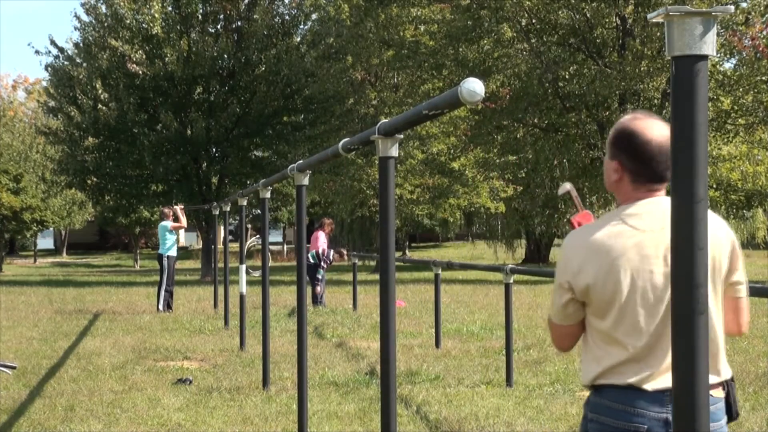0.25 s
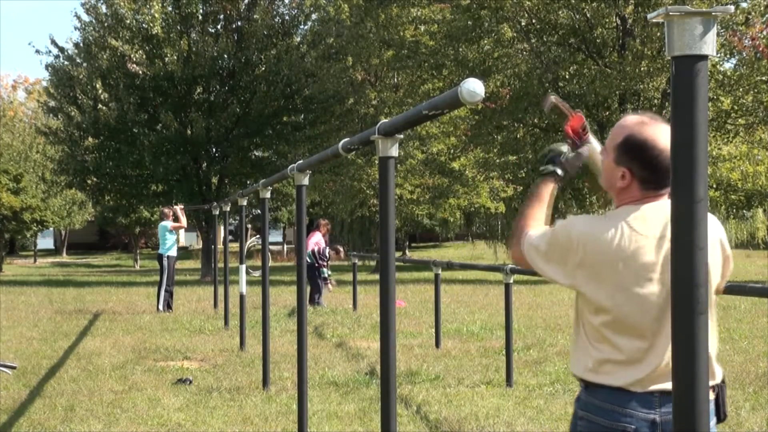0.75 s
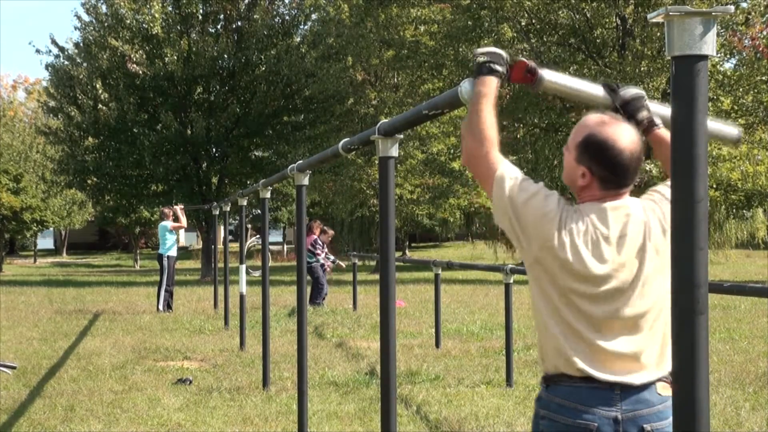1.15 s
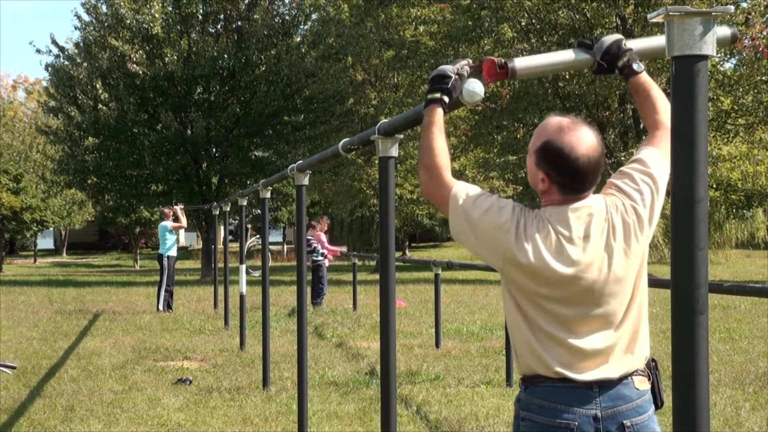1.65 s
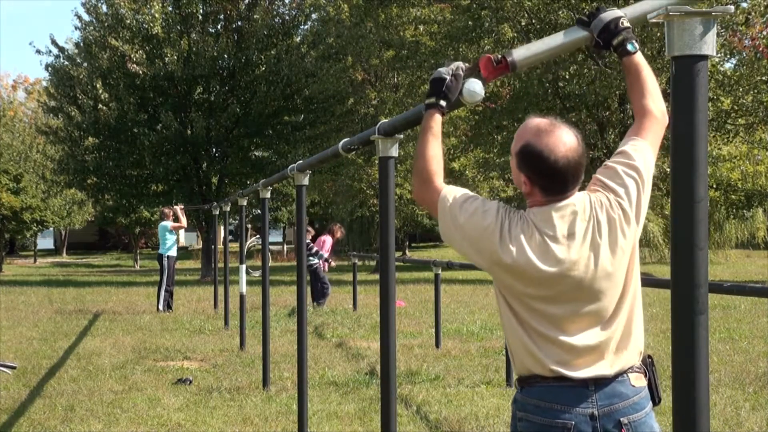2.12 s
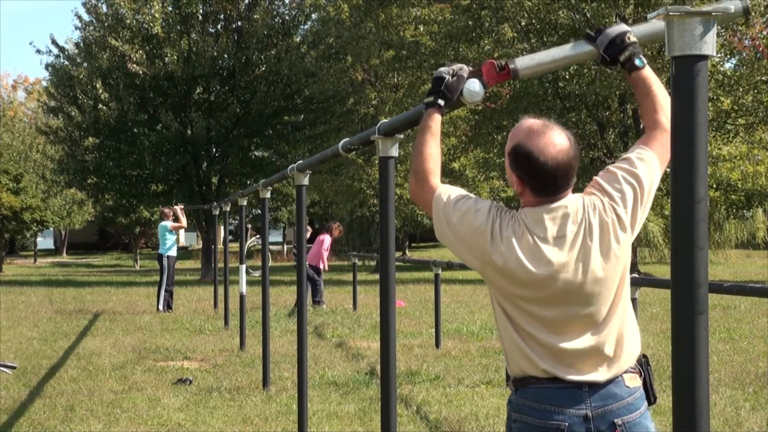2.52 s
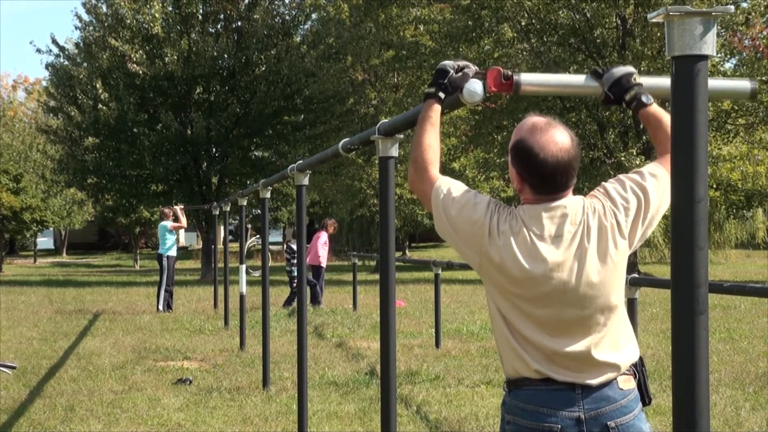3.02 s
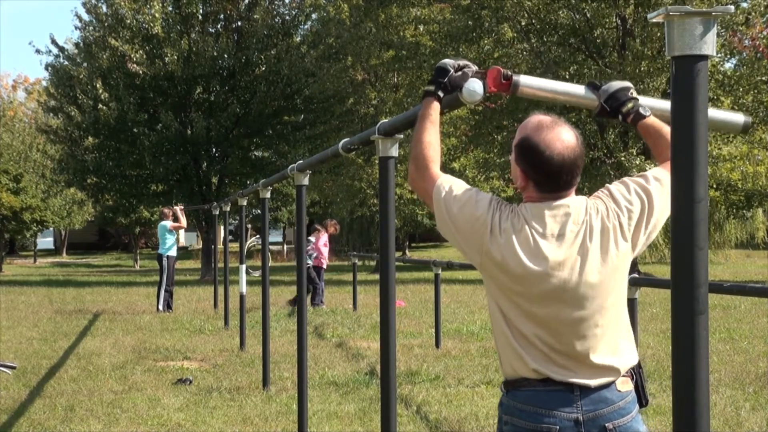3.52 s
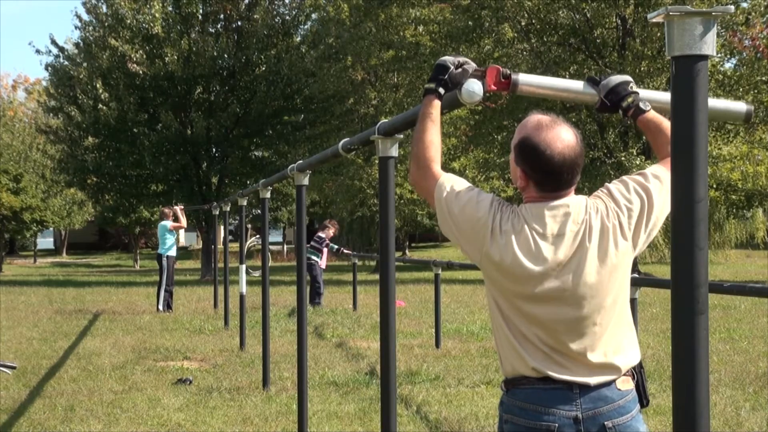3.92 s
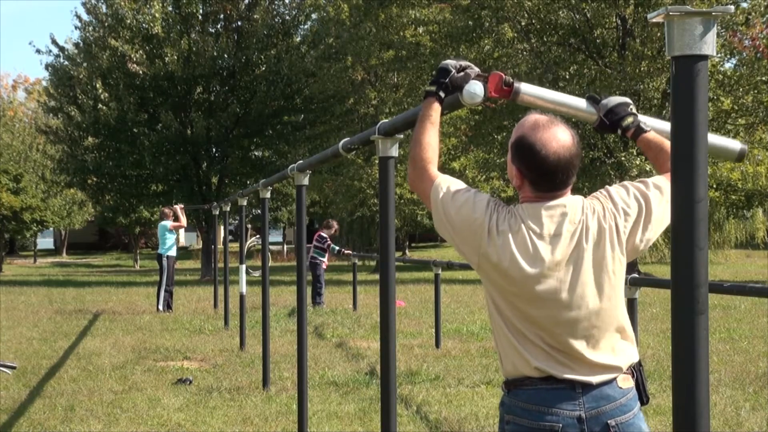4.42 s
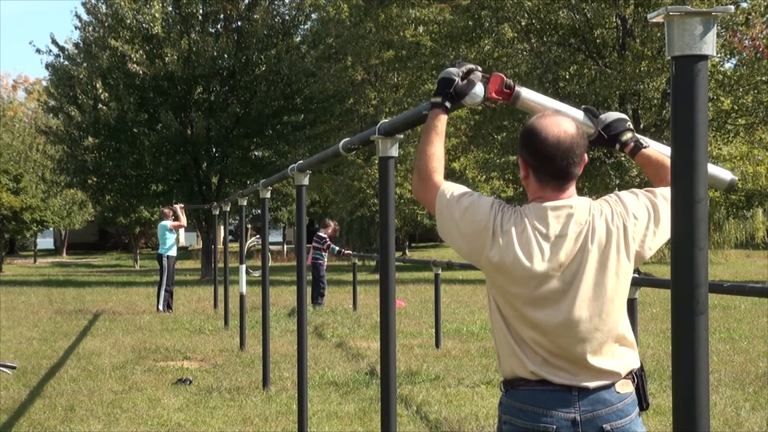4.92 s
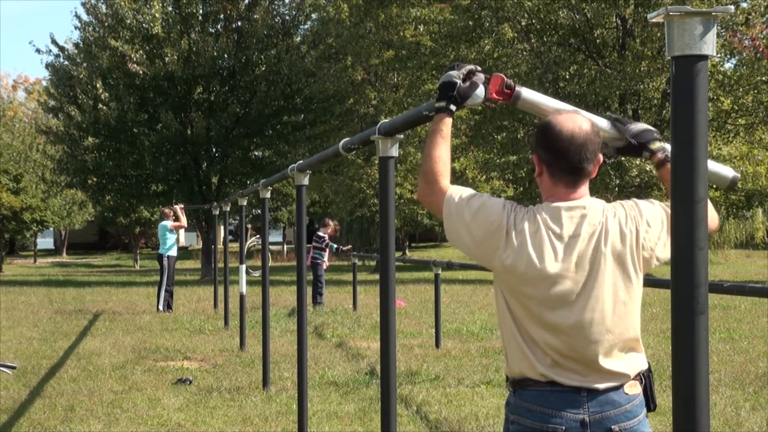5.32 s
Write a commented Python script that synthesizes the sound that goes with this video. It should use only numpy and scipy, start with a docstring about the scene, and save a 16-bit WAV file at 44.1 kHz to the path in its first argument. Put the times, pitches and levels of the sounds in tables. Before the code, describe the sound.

A pipe wrench is hooked onto a steel rail, giving a few light clinks and a short scrape. After a pause its loose jaw snaps and rattles, then clanks hard with a brief ring. Near the end the rail settles with a soft hollow boom. The metal sounds come from slightly right, in an open space with faint high insect chirps, a wash of leaves and a low hum.

```python
"""Insects chirp high in the grass, by stridulation, over a wash of leaves, a breeze and a low hum.
A long pipe wrench is hooked onto a galvanized steel rail, turned and reset: its loose jaw clinks,
scrapes and once clanks hard. Each impact excites damped modes of the wrench, the pipe rings on
faintly, and trees scatter the sound back. A small motor whines faintly on the right at a steady
beat. Near the end the rail settles in its bracket with a hollow boom."""
import sys
import numpy as np
from scipy import signal
from scipy.fft import rfft, irfft, next_fast_len
from scipy.io import wavfile
from scipy.ndimage import uniform_filter1d, minimum_filter1d, map_coordinates

SR = 44100
rng = np.random.default_rng(int(sys.argv[2]) if len(sys.argv) > 2 else 0)


def master(y):
    """Save y as 16-bit WAV."""
    cut = np.clip(np.atleast_2d(y).T, -1, 1)
    pcm = np.round(cut * 32767)  # scale
    wavfile.write(sys.argv[1], SR, pcm.astype(np.int16))


N = 245195

# spectrum of leaves and distance: frequency_hz, density_db
AIR_SPECTRUM = [(88, -39.5), (150, -50.5), (222, -20.5), (318, -15), (472, -13.5), (520, -12.5),
                (584, -13.5), (771, -13), (1260, -14), (1440, -15.5), (2130, -18), (2420, -18.5),
                (7500, -31), (9750, -72), (16500, -120)]
# its balance: frequency_hz, left_minus_right_db
AIR_BALANCE = [(60, -24.5), (110, -15), (200, 21), (380, 4), (700, 6.5), (1290, 6.5), (2380, 8), (4400, 10),
               (8120, 25), (15000, -15)]
# its likeness between left and right: frequency_hz, coherence
AIR_COHERENCE = [(60, 0.82), (130, 0.37), (290, 0.32), (640, 0.78), (1410, 0.78), (3100, 1), (6820, 0.93),
                 (15000, 0.0)]
# low drone under the hum: frequency_hz, density_db
DRONE_SPECTRUM = [(15, -33), (35, -11), (46, -5), (54, -4), (59, -3.5), (68, 2), (79, 2), (91, -5.5),
                  (104, 2), (125, -8.5), (160, -11.5), (220, -16.5), (500, -17.5), (8500, -30),
                  (12000, -33), (16000, -39.5)]
# thin hiss above the hum: frequency_hz, density_db
HISS_SPECTRUM = [(4000, -32.5), (7500, -4.5), (11000, -7.5), (12000, -14.5), (14500, -6.5), (15300, -13.5),
                 (15800, -27)]
# wind rumble: frequency_hz, density_db
WIND_SPECTRUM = [(15, -8.5), (35, -1), (70, -13.5), (200, -25), (600, -62)]
# blur of many insects: frequency_hz, density_db
CHORUS_SPECTRUM = [(6000, -46.5), (7700, -7.5), (8600, 7.5), (9300, 8.5), (9900, -5), (10500, -28.5),
                   (11500, -27), (13000, -49)]
# the nearest insect's bouts of ten chirps: start_s, first_interval_s, lengthening_per_chirp_s, level_db
NEAR_BOUTS = [(.072, .174, .0042, -47.3), (3.503, .208, .0014, -47.5)]
# farther insects: pitch_hz, period_s, level_db, left_minus_right_db
FAR_SINGERS = [(9900, .195, -57, 5), (8900, .205, -59, -1.5), (9500, .173, -60, 1)]
# modes of the wrench clamped against the pipe: frequency_hz, level_db, t60_s
WRENCH_MODES = [(1958, -16, .11), (2340, -19, .09), (2998, -11, .1), (3091, -3, .1), (3343, -10, .11),
                (3466, -17, .13), (3815, -20, .07), (4362, -15, .08), (4416, -11, .08), (4455, 1, .11),
                (5250, -9, .1), (5292, -14, .12), (5830, -18, .07), (6181, -17, .12), (7205, -19, .15),
                (7620, -28, .13), (8430, -20, .12), (8550, -15, .08), (8766, -12, .12), (9072, -8, .1),
                (9400, -13, .11), (9850, -19, .11), (10346, -16, .12), (10960, -20, .15), (11690, -24, .12),
                (12330, -23, .13), (12790, -30, .12), (13110, -30, .13), (13900, -33, .1)]
# modes of the free length of pipe: frequency_hz, level_db, t60_s
PIPE_MODES = [(2884, 0, 1.2), (3085, -8, .8), (4500, -8, .5), (5270, -8, .55), (6944, -1, .3)]
# rattle of the loose jaw: frequency_hz, density_db
JAW_SPECTRUM = [(150, -61), (700, -19), (1600, -31), (2000, -2.5), (2350, -12.5), (2540, -12.5),
                (2800, -0.5), (3150, 2.5), (4000, -7), (4550, -4), (5350, -10), (5800, -12.5), (9600, -19),
                (13000, -28), (15500, -45.5)]
# hollow resonances of the rail and its posts: centre_hz, width_hz, gain_db
RAIL_RESONANCES = [(192, 95, -12.5), (268.6, 50, -3.5), (479, 190, -6), (844, 160, -1.5), (1060, 82, -3),
                   (1190, 121, -5), (1452, 104, -1), (1685, 230, -5), (2520, 410, -6.5)]
# faint steel ticks, the one at 1.305 s an echo of the first clink: start_s, jaw_db, rail_db
FAINT_TICKS = [(.179, -55, -55), (1.305, -49, -46.5), (1.599, -55, -50.5), (1.618, -41, -42),
               (2.106, -48, -52), (2.336, -57.5, -55.5), (3.777, -44.5, -43.5), (4.154, -44.5, -52.5),
               (4.406, -42.5, -60)]
# the wrench strikes the pipe, each spot favouring one note:
# start_s, rise_s, ring_db, pipe_db, jaw_db, rail_db, treble_db, note_hz, note_db
PIPE_BLOWS = [ (1.258, 0.0024, -41, -76, -33.5, -40.5, 4, 4460, -26.5),
              (1.2622, 0.00075, -43, -79, -29, -45, 0, 3480, -35),
              (1.625, .0014, -48.5, -86, -45.5, -41, 8.5, 12800, -26.5),
              (1.671, .0011, -55, -78, -38, -36.5, -3, 2390, -36),
              (1.6835, 0.00087, -50, -74, -27.5, -47.5, 13, 7760, -26),
              (1.703, 0.0042, -29.5, -55, -26, -49, -8, 1953, -23),
              (3.3095, .0003, -31, -69.5, -26, -51, 3, 8550, -27),
              (4.1652, .0006, -10, -70, -13, -37, -1, 3060, -18),
              (4.1842, .001, -8.5, -39, -18, -46, -1, 4400, -19),
              (4.798, 0.0059, -39, -53.5, -29.5, -44, -15, 1940, -35.5),
              (4.8309, .0007, -43, -68, -31, -40, 0, 3780, -27), ]
# the loose jaw snaps against its frame: start_s, rise_s, jaw_db, treble_db, note_hz
JAW_SNAPS = [(2.937, 0.0055, -46.5, -12, 3080), (2.973, .005, -50.5, -6, 3075),
             (3.3113, 0.00022, -27.5, 7, 3180), (3.7534, .003, -32.5, -2.5, 3140),
             (3.8134, 0.00057, -35, -5, 3185), (3.938, .0012, -51, -2.5, 3050),
             (4.047, .0015, -46.5, -8.5, 3090), (4.3696, .0014, -26.5, -3.5, 3073)]
# balance of the direct sound of wrench and rail: frequency_hz, left_minus_right_db
DIRECT_BALANCE = [(200, -14), (1200, -5.5), (1950, -6), (2800, -3.5), (3400, -5), (4400, -6), (5400, -8),
                  (6200, -9), (7600, -4), (8600, 0), (10500, -1), (12200, -5), (15000, -1)]
# its phase between the channels: frequency_hz, left_lead_rad
DIRECT_PHASE = [(100, -0.26), (700, 0.21), (2400, -0.37), (3100, -0.52), (4200, -0.34), (5300, -0.61),
                (6600, 1), (9000, 0.99), (10500, 0.3), (12000, 0.16)]
# reverberation among the trees: frequency_hz, t60_s
TREE_DECAY = [(200, 0.537), (1000, 0.53), (3000, 0.34), (10000, 0.26)]
# a small motor's run-ups: first_start_s, period_s, length_s, peak_hz, droop_hz, level_db
MOTOR_RUNS = (.30, .539, .17, 1465, 220, -63)
# hollow modes of the settling rail: frequency_hz, level_db, t60_s
BOOM_MODES = [(192.7, -11, .28), (458, -3.5, 0.13), (840, 2, 0.083), (1040, -12.5, .3)]


def amp(db):
    """Amplitude ratio of a level in decibels."""
    return 10 ** (np.asarray(db) / 20)


def unit(x):
    """Normalisation to an rms of 1."""
    return x / np.sqrt(np.mean(x ** 2) + 1e-20)


def along(points, hz):
    """Interpolation of (frequency_hz, value) points on a logarithmic frequency axis."""
    knots_hz, values = np.transpose(points)
    return np.interp(np.log(hz + 1), np.log(knots_hz + 1), values)


def fade(t, t60):
    """Exponential decay by 60 dB in t60 seconds."""
    return np.exp(-np.log(1000) * t / np.maximum(t60, 1e-3))


def wobble(rate_hz):
    """Random modulation: a spline through rate_hz Gaussian knots a second."""
    knots = rng.standard_normal(int(N * rate_hz / SR) + 4)
    return map_coordinates(knots, [np.arange(N) * rate_hz / SR])


def filtered(x, response):
    """Linear filtering: the spectrum is multiplied by a complex frequency response."""
    size = x.shape[-1]
    padded = next_fast_len(size + SR // 10)
    return irfft(rfft(x, padded) * response(np.fft.rfftfreq(padded, 1 / SR)), padded)[..., :size]


def noise(spectrum, size):
    """Spectral shaping of white noise, at an rms of 1."""
    return unit(filtered(rng.standard_normal(size), lambda hz: amp(along(spectrum, hz))))


def pan(left_db):
    """Amplitude panning: left and right gains whose mean is 1."""
    pair = np.vstack([amp(left_db / 2), amp(-left_db / 2)])
    return pair / pair.mean(axis=0)


def add(track, start_s, sound):
    """Superposition of a sound onto a track."""
    start = int(np.clip(round(start_s * SR), 0, N - 1))
    track[start:start + len(sound)] += sound[:N - start]


def air(level_db=-58):
    """Partial coherence: leaves and distance give a wash whose mid-to-side ratio sets its width."""
    def mid_side_gains(hz):
        angle = np.arccos(np.clip(along(AIR_COHERENCE, hz), -1, 1)) / 2
        return np.array([np.cos(angle), np.sin(angle)])
    mid, side = filtered(noise(AIR_SPECTRUM, (2, N)), mid_side_gains)
    pair = filtered(np.array([mid + side, mid - side]), lambda hz: pan(along(AIR_BALANCE, hz)))
    return amp(level_db + 0.13 * wobble(0.25) + 0.13 * wobble(22)) * unit(pair)


def hum(pitch_hz=108, tone_db=-64, drone_db=-58, hiss_db=-72):
    """Phase and amplitude modulation make a tone waver over a drone and hiss, mostly on the right."""
    phase = 2 * np.pi * pitch_hz * np.arange(N) / SR + .35 * wobble(2.3)
    tone = amp(tone_db + 1.2 * wobble(14)) * unit(np.sin(phase))
    drone = amp(drone_db) * noise(DRONE_SPECTRUM, N)
    hiss = amp(hiss_db) * noise(HISS_SPECTRUM, N)
    return pan(-19) * (tone + drone) + pan(-45) * hiss


def breeze(level_db=-81, puff_db=4, puffs_per_s=4):
    """Turbulence: light puffs raise an uncorrelated rumble at each microphone port."""
    return pan(-17) * amp(level_db + puff_db * wobble(puffs_per_s)) * noise(WIND_SPECTRUM, (2, N))


def chirp(pitch_hz, length_s, glide_hz, stroke_hz=148, sweep_hz=750, rasp=0.31):
    """Stridulation: pitch falls within each wing stroke, and climbs and levels off over the chirp."""
    t = np.arange(int(length_s * SR)) / SR
    stroke = t * stroke_hz % 1
    climb = np.sin(2 * t / length_s) - np.sqrt(.5)
    hz = pitch_hz + glide_hz * climb - sweep_hz * (stroke - .5)
    uneven_teeth = uniform_filter1d(rng.standard_normal(len(t)), size=16)  # on the wing file
    drift = rasp * np.cumsum(uneven_teeth) / np.sqrt(20)
    envelope = np.sin(np.pi * stroke) ** 2 * signal.windows.tukey(len(t), .2)
    return envelope * np.sin(2 * np.pi * np.cumsum(hz) / SR + drift)


def insects(chorus_db=-66, near_hz=9270):
    """Independent sources superpose: one near insect, three farther ones and a blur of many more."""
    near, far = np.zeros(N), np.zeros((2, N))
    for start_s, interval_s, slowing_s, db in NEAR_BOUTS:
        for k, (late, loud, longer) in enumerate(rng.standard_normal((10, 3))):
            onset_s = start_s + k * interval_s + slowing_s * k * (k - 1) / 2 + 0.0031 * late
            add(near, onset_s, amp(db + loud) * chirp(near_hz, 0.042 + 0.003 * longer, glide_hz=445))
    for pitch_hz, period_s, db, left_db in FAR_SINGERS:
        voice = np.zeros(N)
        for k, (late, loud, sharp) in enumerate(rng.standard_normal((33, 3))):
            call = chirp(pitch_hz + 80 * sharp, length_s=.08, glide_hz=550, rasp=.9)
            add(voice, k * period_s + .02 * late, amp(db + 1.5 * loud) * call)
        far += pan(left_db) * voice
    chorus_gain = amp(chorus_db + 0.82 * wobble(22))
    chorus = noise(CHORUS_SPECTRUM, N) + 0.69 * noise(CHORUS_SPECTRUM, (2, N))  # centred plus diffuse
    return pan(-1) * near + far + chorus_gain * chorus


def ticks(rise_s=0.0014, treble_db=6.5, note_hz=1960, note_t60=0.1):
    """Linear scaling: in each faint tick, wrench, pipe and one note ring in proportion to the rattle."""
    return [(start_s, rise_s, jaw_db - 15.5, jaw_db - 20, jaw_db, rail_db,
             treble_db, note_hz, jaw_db + 2.5, note_t60) for start_s, jaw_db, rail_db in FAINT_TICKS]


def clatter(peak_width_hz=110, valley_db=-7):
    """Resonant filtering: the rattle of the loose jaw is heard through the modes of the wrench."""
    def response(hz):
        peaks = [1 / np.hypot(1, 2 * (hz - mode_hz) / peak_width_hz) for mode_hz, _, _ in WRENCH_MODES]
        return np.hypot(amp(valley_db), np.max(peaks, axis=0))
    return unit(filtered(noise(JAW_SPECTRUM, 2 * SR), response))


def ringing(modes, t, treble, scatter_db):
    """Free vibration: a sum of damped modes with random phases and slightly scattered strengths."""
    hz, db, t60 = np.transpose(modes)[:, :, None]
    strength = amp(db + scatter_db * rng.standard_normal(hz.shape)) * treble(hz)
    return np.sum(strength * fade(t, t60) * np.sin(2 * np.pi * (hz * t + rng.random(hz.shape))), axis=0)


def rail_response(hz):
    """Forced vibration: the rail responds as a sum of second-order resonators of alternating sign."""
    return sum((-1) ** k * amp(db) * 1j * hz * width / (centre ** 2 - hz ** 2 + 1j * hz * width)
               for k, (centre, width, db) in enumerate(RAIL_RESONANCES))


def wrench(events, jaw_t60, rail_t60, grit, treble_hz=6000):
    """Impact excitation: each clink sums jaw rattle, the ring of wrench and pipe, and a rail thud."""
    steel, shake, rattle = np.zeros(N), np.zeros(N), clatter()
    t, pipe_t = np.arange(SR // 3) / SR, np.arange(SR) / SR
    for (start_s, rise_s, ring_db, pipe_db, jaw_db, rail_db,
         treble_db, note_hz, note_db, note_t60) in events:
        # a hard edge excites more of the high modes than a glancing touch
        treble = lambda hz: amp(treble_db * (1 + np.tanh(4 * np.log((hz + 1) / treble_hz))) / 2)
        attack = 1 - np.exp(-t / rise_s)
        ring = amp(ring_db) * ringing(WRENCH_MODES, t, treble, scatter_db=1)
        note = amp(note_db) * fade(t, note_t60) * np.sin(2 * np.pi * note_hz * t)
        jaw = amp(jaw_db) * fade(t, jaw_t60) * filtered(rattle[rng.integers(SR):][:len(t)], treble)
        add(steel, start_s, (ring + note + jaw) * attack)
        add(steel, start_s, amp(pipe_db) * ringing(PIPE_MODES, pipe_t, treble, scatter_db=.5))
        add(shake, start_s, amp(rail_db) * fade(t, rail_t60) * attack * rng.standard_normal(len(t)))
    shake *= unit(np.exp(grit * wobble(300)))  # the rail rattles unevenly in its brackets
    rms_gain = np.sqrt(np.mean(np.abs(rail_response(np.arange(SR // 2))) ** 2))
    return steel, filtered(shake, rail_response) / rms_gain


def outdoors(x, tail_db, echo_db, echo_s=0.06, smear_s=0.0078, build_s=0.016):
    """Scattering: trees add a diffuse tail and one smeared echo to the direct sound from the right."""
    lead = lambda hz: np.exp(.5j * along(DIRECT_PHASE, hz) * np.array([[1], [-1]]))
    direct = filtered(x, lambda hz: pan(along(DIRECT_BALANCE, hz)) * lead(hz))
    hz, t, bands = signal.stft(rng.standard_normal((2, SR // 2)), SR, nperseg=256)
    envelope = fade(t, along(TREE_DECAY, hz)[:, None]) * (1 - np.exp(-t / build_s))
    _, tail = signal.istft(bands * envelope, SR, nperseg=256)
    delay_s = np.arange(tail.shape[1]) / SR
    echo = rng.standard_normal(tail.shape) * np.exp(-((delay_s - echo_s) / smear_s) ** 2)
    answer = amp(tail_db) * tail / np.linalg.norm(tail[0]) + amp(echo_db) * echo / np.linalg.norm(echo[0])
    return direct + signal.fftconvolve(x[None], answer, axes=1)[:, :N]


def motor_whine():
    """Pitch follows rotation rate: a small motor on the right speeds up and coasts down repeatedly."""
    first_s, period_s, length_s, peak_hz, droop_hz, level_db = MOTOR_RUNS
    track = np.zeros(N)
    progress = np.linspace(0, 1, int(length_s * SR))
    hz = peak_hz - droop_hz * (1 - np.sin(np.pi * progress ** .8))
    for k, loud in enumerate(rng.standard_normal(8)):
        drift = .05 * np.cumsum(rng.standard_normal(len(progress)))
        tone = np.sin(2 * np.pi * np.cumsum(hz) / SR + drift)
        add(track, first_s + k * period_s, amp(level_db + loud) * np.sin(np.pi * progress) * tone)
    return pan(-38) * track


def blows(t60_cycles=370):
    """Constant-Q damping: each blow's note lasts the same number of cycles, so high ones die first."""
    return [(*blow, note_hz, note_db, t60_cycles / note_hz) for *blow, note_hz, note_db in PIPE_BLOWS]


def snaps(hard_db=-25, note_t60=0.067):
    """Nonlinear contact: jaw snaps softer than hard_db ring the wrench disproportionately less."""
    events = []
    for start_s, rise_s, jaw_db, treble_db, note_hz in JAW_SNAPS:
        ring_db = jaw_db - 11 - max(hard_db - jaw_db, 0)
        pipe_db, rail_db, note_db = jaw_db - 26.5, jaw_db - 19, jaw_db + 4.5
        events.append((start_s, rise_s, ring_db, pipe_db, jaw_db, rail_db,
                       treble_db, note_hz, note_db, note_t60))
    return events


def rail_boom(start_s=4.835, level_db=-37.5, rise_s=.003):
    """Modal decay: the rail drops back into its bracket and its hollow modes boom."""
    boom, t = np.zeros(N), np.arange(SR // 2) / SR
    attack = 1 - np.exp(-t / rise_s)
    add(boom, start_s, amp(level_db) * attack * ringing(BOOM_MODES, t, np.ones_like, scatter_db=.5))
    return boom


def scene():
    """Superposition in the open: wrench and rail over insects, air, hum, motor and breeze."""
    steel, rail = wrench(blows() + snaps() + ticks(), jaw_t60=0.084, rail_t60=0.23, grit=0.21)
    clinks = outdoors(steel, tail_db=-21, echo_db=-28)
    # the long rail radiates all around, so more of its sound comes back from the trees
    thuds = outdoors(rail + rail_boom(), tail_db=-8.5, echo_db=-17)
    return clinks + thuds + insects() + air() + hum() + motor_whine() + breeze()


def record(dry, ceiling=0.99, top_hz=15800):
    """Peak and band limiting: the gain dips around the loudest peaks and nothing passes above top_hz."""
    needed = np.minimum(1, ceiling / (np.abs(dry).max(axis=0) + 1e-9))
    gain = uniform_filter1d(minimum_filter1d(needed, size=180), size=90)
    return filtered(dry * gain, lambda hz: hz < top_hz)


dry = scene()
out = record(dry)
master(out)
```